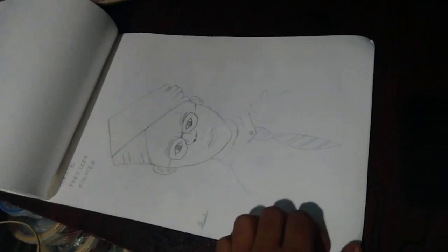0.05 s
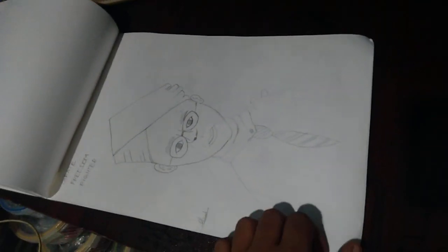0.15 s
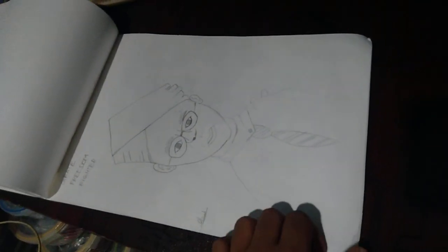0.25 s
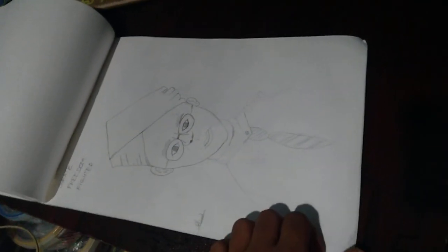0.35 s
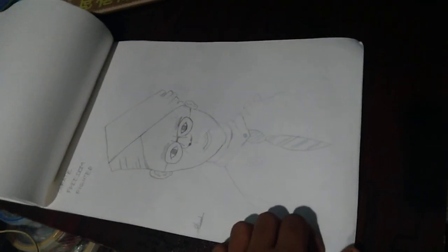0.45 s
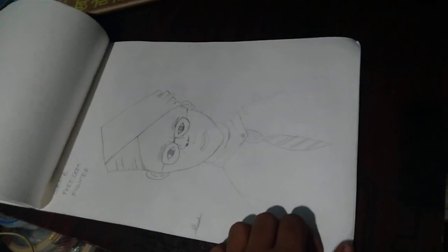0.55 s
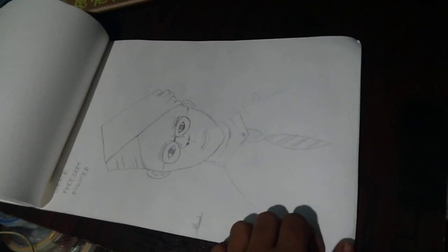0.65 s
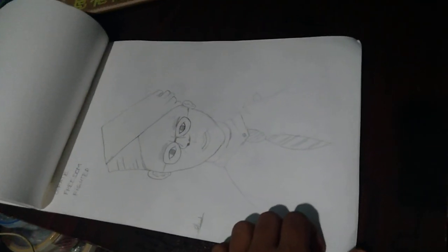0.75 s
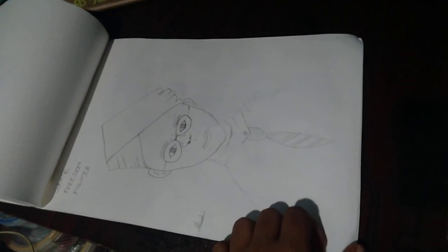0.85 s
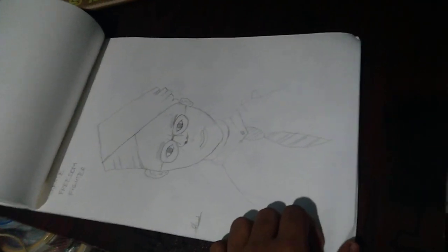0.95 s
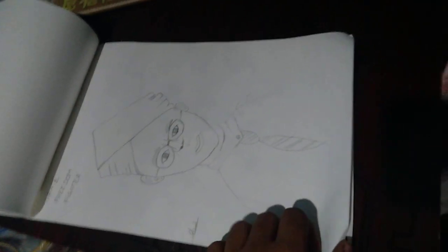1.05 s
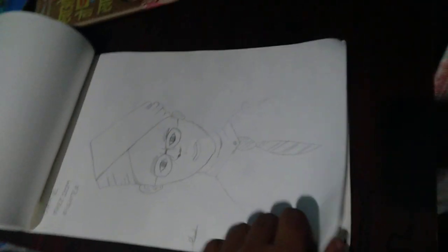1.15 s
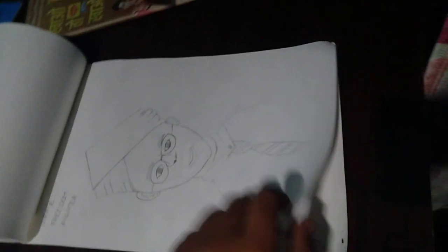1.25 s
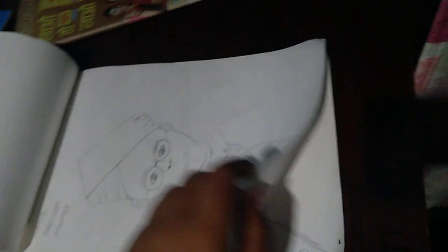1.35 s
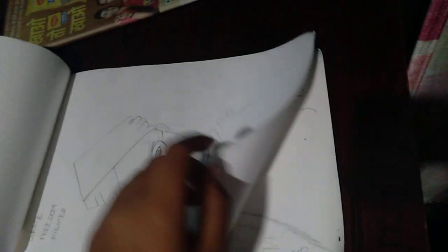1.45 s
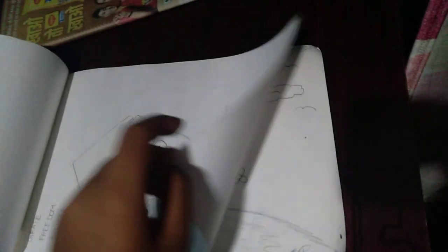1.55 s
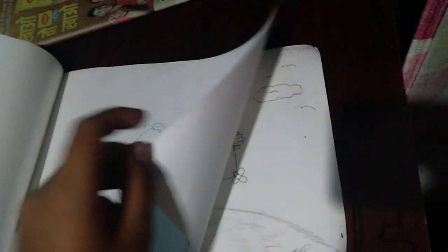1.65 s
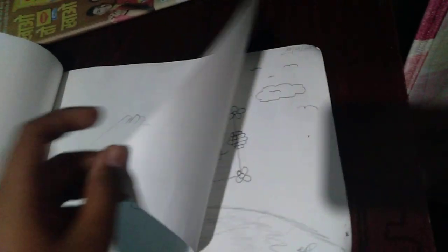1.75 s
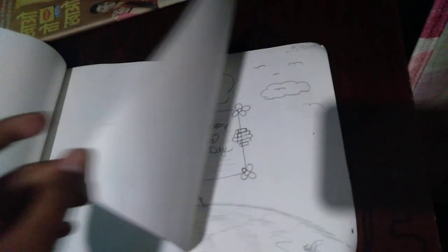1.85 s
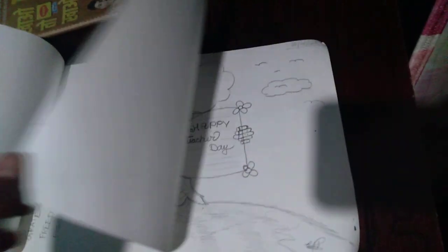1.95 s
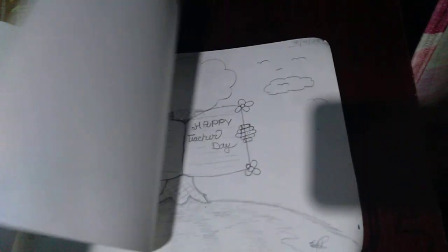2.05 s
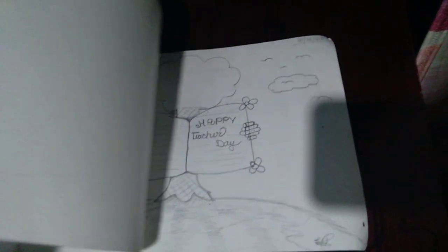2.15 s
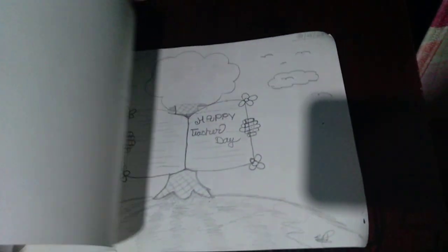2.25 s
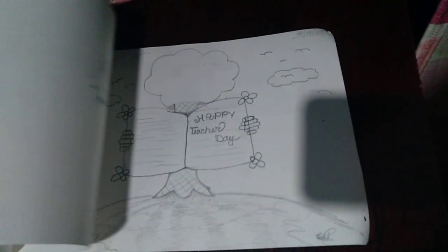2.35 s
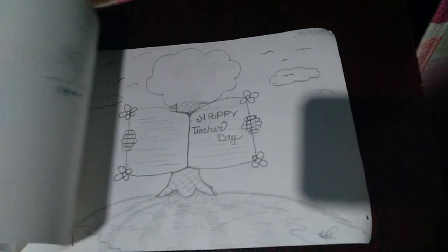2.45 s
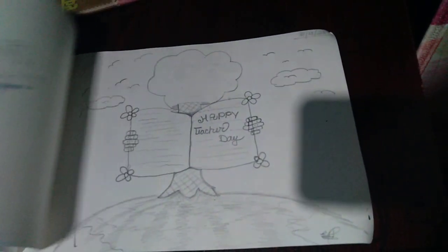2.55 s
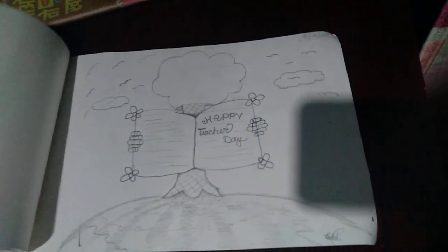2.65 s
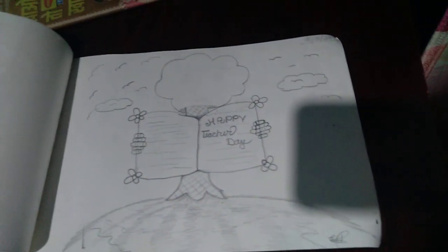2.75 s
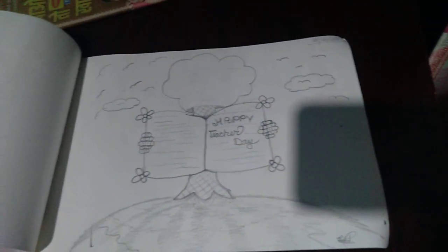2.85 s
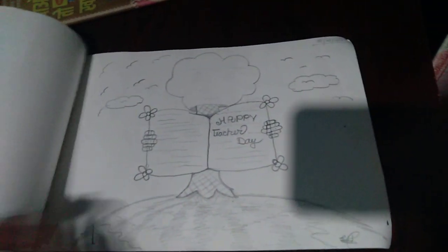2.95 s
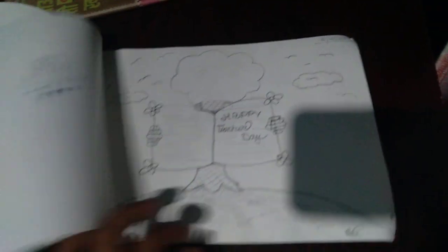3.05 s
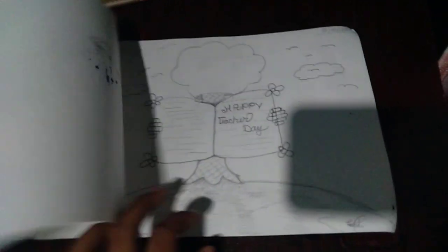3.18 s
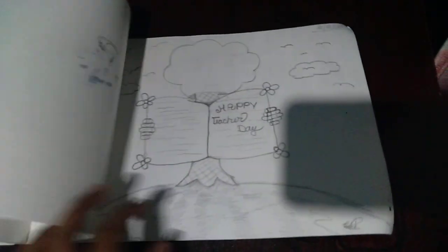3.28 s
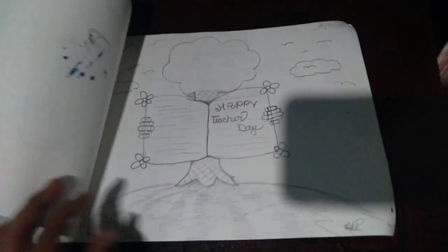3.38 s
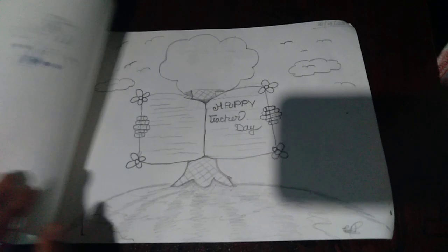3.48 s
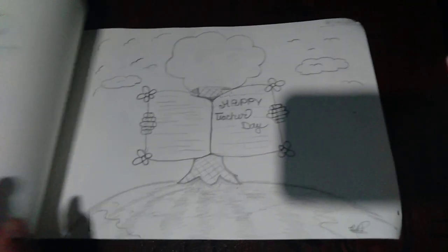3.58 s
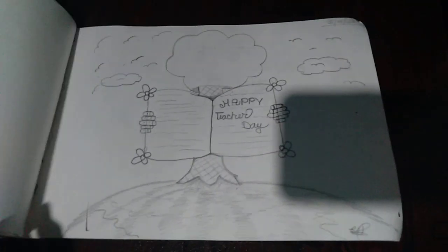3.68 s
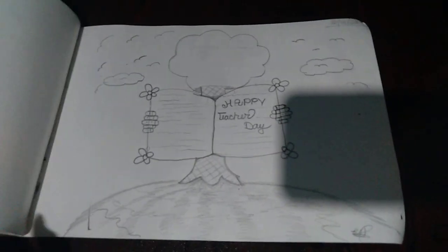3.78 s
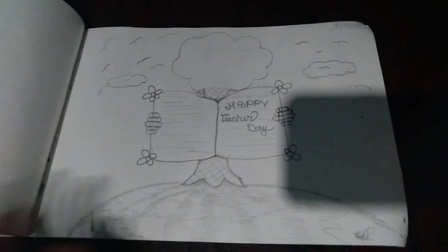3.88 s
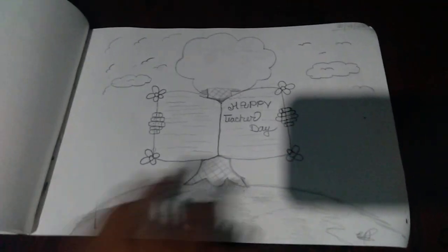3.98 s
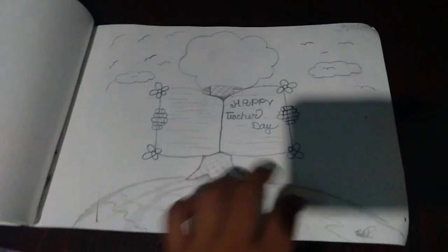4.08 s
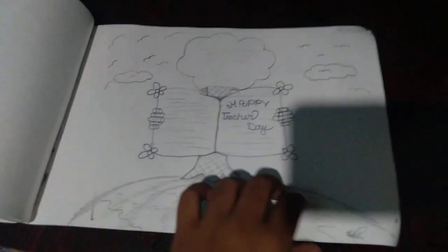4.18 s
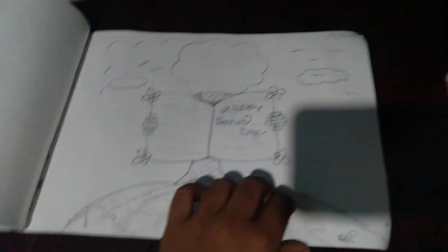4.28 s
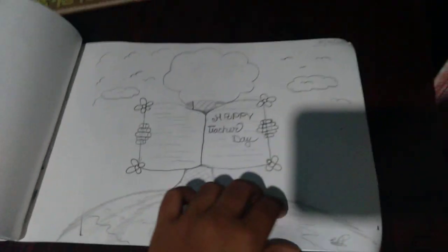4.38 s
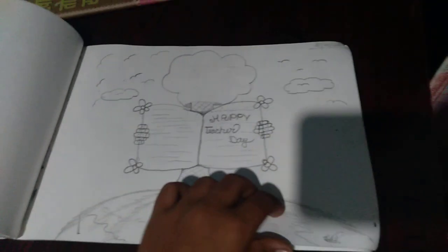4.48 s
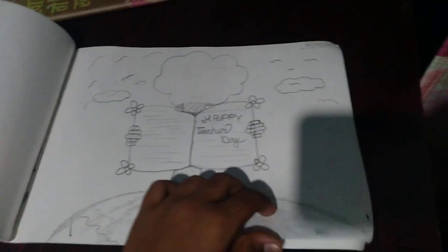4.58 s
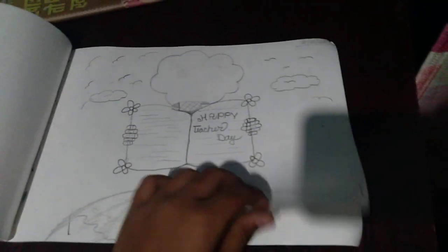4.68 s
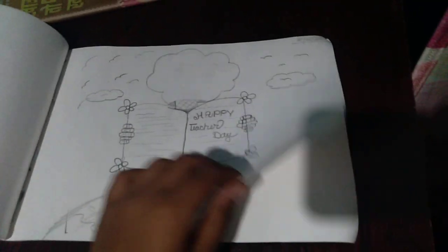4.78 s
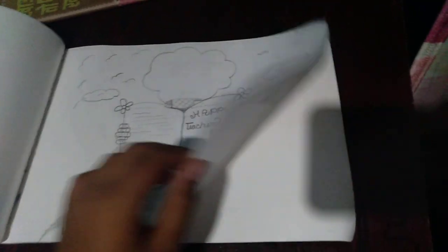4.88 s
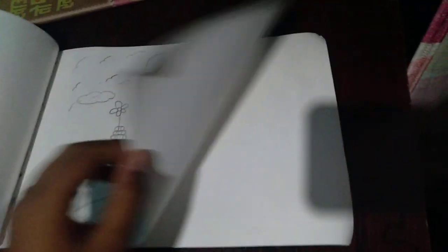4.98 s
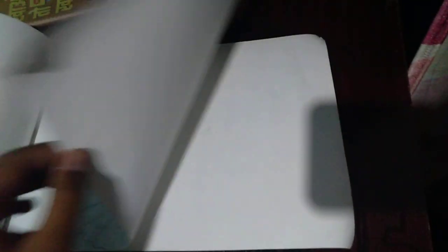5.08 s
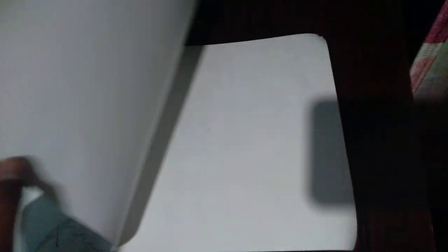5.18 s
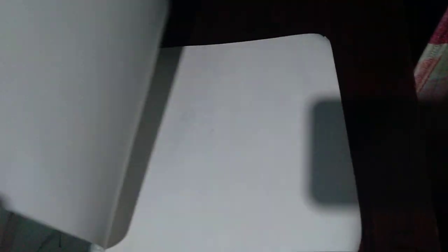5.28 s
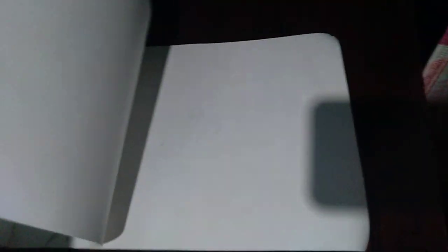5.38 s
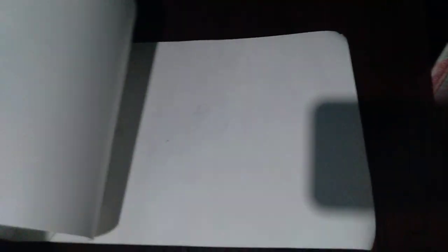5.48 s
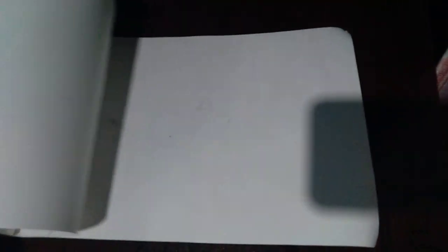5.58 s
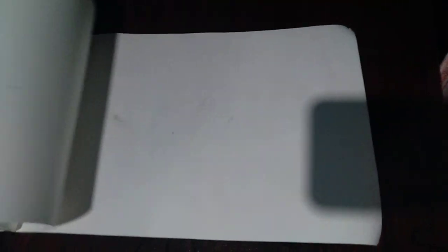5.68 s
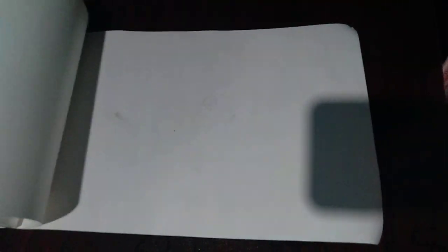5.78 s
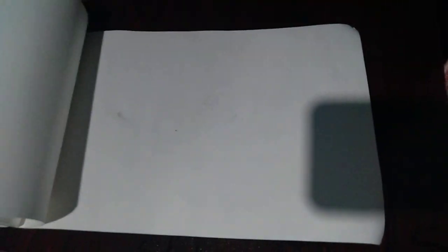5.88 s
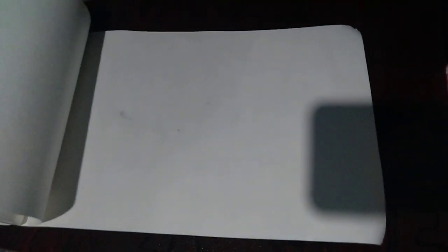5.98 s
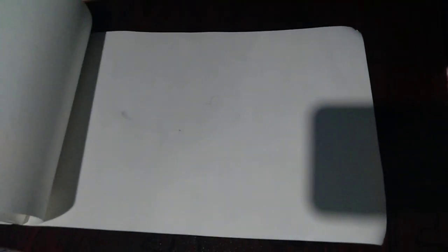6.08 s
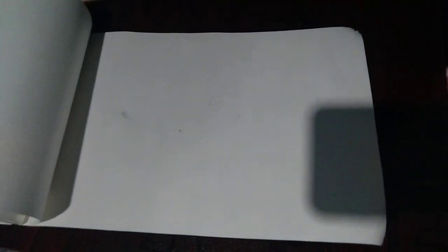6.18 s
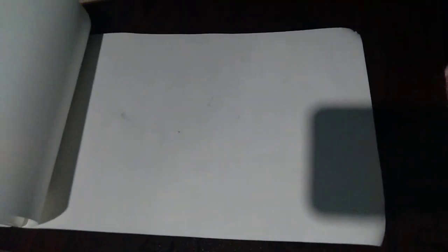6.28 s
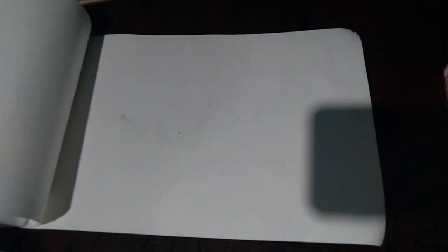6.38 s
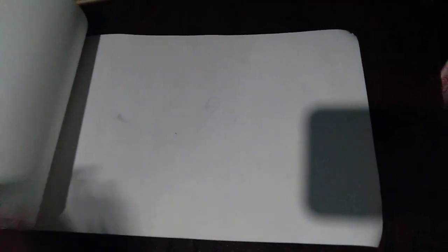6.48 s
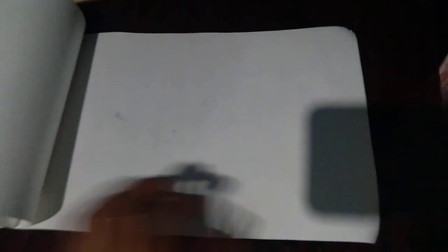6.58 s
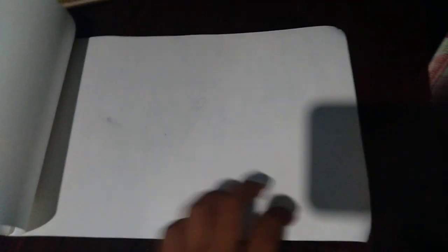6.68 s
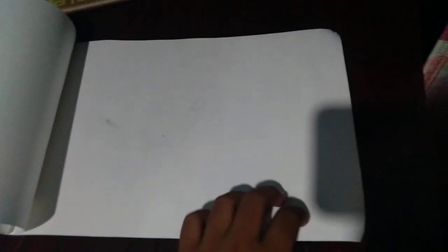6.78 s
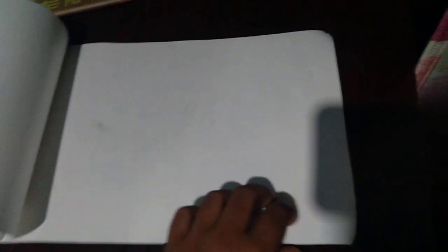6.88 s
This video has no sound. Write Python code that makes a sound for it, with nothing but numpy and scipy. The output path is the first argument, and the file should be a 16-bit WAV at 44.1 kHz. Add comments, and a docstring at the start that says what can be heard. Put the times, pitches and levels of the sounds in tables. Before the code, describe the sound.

Close up, a hand rubs softly over paper before turning two stiff pages of a sketchbook. The sheets buckle with crisp snaps and scrape over each other in brief rustles, loudest near the middle. Between and after the turns, the hand brushes the paper and nudges the book on the table with faint low thuds. The room is quiet, with only a slight hiss.

```python
"""Two stiff sketchbook pages are turned by hand on a table, close to a mono microphone in a quiet room.
First fingers brush the paper, with soft low thuds, small snaps and faint hollow swishes.
From about 2 to 5 s the pages turn: each snaps as it bends, then slides over its neighbour in short,
dense rustles that stop when the edge comes free. Between the turns and after them the hand brushes
the paper and nudges the book, and a few last snaps come after 6 s."""
import sys
import numpy as np
from scipy import signal
from scipy.fft import rfft, irfft, next_fast_len
from scipy.io import wavfile
from scipy.ndimage import uniform_filter1d, map_coordinates

SR = 44100
rng = np.random.default_rng(int(sys.argv[2]) if len(sys.argv) > 2 else 0)


def transcribe(signal):
    """Save signal, clipped to [-1, 1], as a 16-bit WAV file at the path in sys.argv[1]."""
    frames = np.atleast_2d(signal).T
    limited = np.clip(frames, -1, 1)
    pcm = np.round(limited * 32767).astype(np.int16)
    wavfile.write(sys.argv[1], SR, pcm)


N = 306054
T = np.arange(N) / SR
FREQS = np.maximum(np.fft.rfftfreq(N, 1 / SR), 1)


def undb(db):
    """Decibels to gain."""
    return 10 ** (np.asarray(db) / 20)


def unit(x):
    """Scale to rms 1."""
    return x / np.sqrt(np.mean(x ** 2))


def eq_curve(tone):
    """Gain at every frequency, drawn through (freq_hz, gain_db) points."""
    hz, db = np.transpose(tone)
    return undb(np.interp(np.log(FREQS), np.log(hz), db))


def colour(x, tone):
    """EQ a signal and scale it to rms 1."""
    return unit(irfft(rfft(x) * eq_curve(tone), N))


def resonate(x, hz, width_hz):
    """A damped resonance with steep skirts, centred in time on its push."""
    size = next_fast_len(len(x))
    freqs = np.maximum(np.fft.rfftfreq(size, 1 / SR), 1)
    detune = (freqs - hz ** 2 / freqs) / width_hz
    return irfft(rfft(x, size) / np.sqrt(1 + detune ** 4), size)[:len(x)]


def drift(rate_hz):
    """Smooth random modulation at rms 1."""
    hold = max(int(SR / rate_hz), 2)
    steps = np.repeat(rng.standard_normal(N // hold + 1), hold)[:N]
    return unit(uniform_filter1d(steps, hold))


def swell(peak_s, rise_s, fade_s):
    """Span and envelope of a soft touch: exponential attack, exponential decay."""
    span = slice(max(int((peak_s - 6 * rise_s) * SR), 0), int((peak_s + 6 * fade_s) * SR))
    return span, np.exp(np.minimum((T[span] - peak_s) / rise_s, (peak_s - T[span]) / fade_s))


def friction(slips_per_s, spread_db, smooth_db):
    """Paper fibres catch and slip: dense clicks of uneven size over a smooth hiss."""
    slips = (rng.random(N) < slips_per_s / SR) * rng.choice([-1, 1], N)
    sizes = undb(spread_db * np.minimum(rng.exponential(size=N), 4))
    return unit(unit(slips * sizes) + undb(smooth_db) * rng.standard_normal(N))


def band_flicker(x, depth_db, hold_s, band_hz):
    """A watery effect: now and then a narrow band swells out of the rest."""
    size = 1024
    hz, s, spectrum = signal.stft(x, SR, nperseg=size)
    field = rng.standard_normal((size, size))
    grid = np.meshgrid(hz / band_hz, s / hold_s, indexing="ij")
    wander = map_coordinates(field, grid, order=2, mode="wrap")
    gain = undb(depth_db * np.clip(wander, -.5, 2))
    return unit(signal.istft(spectrum * gain, SR, nperseg=size)[1][:N])


# EQ of the background hiss: freq_hz, gain_db
BACKGROUND_TONE = [(100, -2), (300, 0), (1000, -17), (2500, -15.5), (4200, -21.5), (6500, -2.5),
                   (8000, -4.5), (11000, 1), (15500, -13)]

def background_hiss(level_db=-80):
    """A faint, steady bed of noise."""
    return colour(rng.standard_normal(N), BACKGROUND_TONE) * undb(level_db)


# EQ of skin rubbing on paper: freq_hz, gain_db
SKIN_TONE = [(300, -12.5), (550, -15.5), (800, -7), (1100, -8.5), (1600, -7.5), (2500, -6.5), (3500, -7.5),
             (5000, -15.5), (7000, -28)]
# EQ of the fine hiss on top of the rub: freq_hz, gain_db
FINE_HISS_TONE = [(3500, -27), (5200, -1), (6300, 2), (7300, 7.5), (8200, 7), (9500, -8.5), (11000, 3.5),
                  (13000, -15), (15500, -11.5)]
# finger moves on the page: peak_s, rise_s, fade_s, skin_db, centre_hz, hiss_db
BRUSHES = [ (0.02, 0.091, 0.24, -62, 3060, -63), (0.124, 0.028, 0.036, -55, 3040, -50),
           (0.41, 0.0023, 0.027, -62, 3740, -61.5), (0.659, 0.024, 0.026, -72.5, 2400, -56),
           (1.02, 0.054, 0.062, -73.5, 1490, -68.5), (1.31, 0.017, 0.092, -60.5, 3240, -56.5),
           (1.605, 0.017, 0.063, -62.5, 1880, -64.5), (1.89, 0.062, 0.12, -62.5, 1920, -66),
           (2.669, 0.072, 0.036, -58, 1790, -60), (2.92, 0.07, 0.036, -69.5, 1670, -68),
           (3.45, 0.13, 0.21, -60, 2230, -60), (3.6, 0.063, 0.09, -70, 3030, -55.5),
           (4.227, 0.0022, 0.14, -61.5, 2000, -63.5), (4.407, 0.0026, 0.26, -61, 2600, -66.5),
           (4.87, 0.086, 0.047, -63.5, 2390, -59.5), (5.42, 0.012, 0.075, -68, 2960, -71),
           (5.72, 0.05, 0.057, -70.5, 1500, -75.5), (5.89, 0.024, 0.094, -65.5, 1610, -77.5),
           (6.33, 0.089, 0.082, -65, 1650, -59), (6.41, 0.002, 0.056, -61.5, 3500, -58.5),
           (6.54, 0.022, 0.065, -96, 4170, -60), (6.869, 0.058, 0.11, -72.5, 3880, -61.5)]

def fingers(rest_skin_db=-82, rest_hiss_db=-73.5, emphasis_db=1.5):
    """Skin brushes the page in short moves, and freed sheets drag on a little."""
    drags = [(release_s, 0.019, 0.14, -64.5, 1900, -67.5) for release_s in RELEASES_S]
    rub = friction(slips_per_s=900, spread_db=3, smooth_db=1)
    # a faint, watery flicker of narrow bands is laid over the rubbing noise
    rub = band_flicker(rub, depth_db=12, hold_s=.05, band_hz=110)
    skin = colour(rub, SKIN_TONE)
    out = skin * undb(rest_skin_db)  # the resting hand is never quite still
    hiss_power = np.full(N, undb(rest_hiss_db) ** 2)
    for peak_s, rise_s, fade_s, skin_db, centre_hz, hiss_db in BRUSHES + drags:
        span, speed = swell(peak_s, rise_s, fade_s)
        patch = np.roll(skin, rng.integers(N))[span]  # every move meets fresh paper
        emphasis = undb(emphasis_db) * resonate(patch, centre_hz, width_hz=0.98 * centre_hz)
        out[span] += unit(patch + emphasis) * speed * undb(skin_db)
        hiss_power[span] += (speed * undb(hiss_db)) ** 2
    return out + np.sqrt(hiss_power) * colour(rub, FINE_HISS_TONE)


# EQ of the thuds and room rumble: freq_hz, gain_db
RUMBLE_TONE = [(20, -18), (45, -19), (62, -5), (72, 1), (82, -10), (115, -8), (200, -44.5)]
# soft low thuds: peak_s, fade_s, level_db
THUDS = [(0.092, 0.048, -67), (0.435, 0.054, -68.5), (2.293, 0.13, -52), (3.184, 0.06, -58),
         (3.778, 0.055, -56.5), (4.048, 0.03, -65), (4.313, 0.11, -63), (4.97, 0.13, -58),
         (5.72, 0.074, -69.5), (6.687, 0.05, -70)]

def thuds(rumble_db=-82.5):
    """The page pushes air or the book shifts: low swells out of the room's faint rumble."""
    power = np.full(N, undb(rumble_db) ** 2)
    for peak_s, fade_s, level_db in THUDS:
        span, envelope = swell(peak_s, 0.75 * fade_s, fade_s)
        power[span] += (envelope * undb(level_db)) ** 2
    return colour(rng.standard_normal(N), RUMBLE_TONE) * np.sqrt(power)


# EQ of a snap's broadband crack: freq_hz, gain_db
CRACK_TONE = [(100, -16.5), (1000, -11.5), (3000, 9), (6000, -8), (9000, 14.5), (12500, -10.5), (15500, -1)]
# sheet snaps and finger taps: peak_s, length_ms, body_hz, width_hz, body_db, crisp_db, crack_db
SNAPS = [ (0.1286, 4.2, 3100, 1500, -43, -55, -39), (0.137, 6.1, 2820, 1800, -51, -55, -46),
         (2.197, 2.1, 403, 400, -37.5, -62, -68), (2.209, 12, 530, 219, -41.5, -42, -57),
         (2.2417, 2.4, 3430, 1500, -36.5, -39, -55), (2.342, 13, 776, 150, -48, -46, -66),
         (2.679, 2.9, 1290, 648, -43, -54.5, -72), (3.0377, 2.8, 3330, 895, -26.5, -23, -31),
         (3.047, 3.9, 2020, 2500, -32, -28, -39), (3.094, 1.7, 1190, 1200, -42, -56, -50.5),
         (3.1161, 2.1, 2370, 1960, -23, -27.5, -46), (3.115, 2.1, 773, 622, -21, -46, -46),
         (3.12, 4.7, 1445, 390, -28.5, -46, -35), (3.137, 16, 950, 893, -34.5, -49.5, -50),
         (3.3, 15, 1500, 2110, -43.5, -44, -62), (3.6147, 3.8, 4200, 2420, -47.5, -36, -49.5),
         (3.737, 4.8, 1500, 2000, -43, -53, -37), (4.0552, 3.25, 520, 279, -35, -43.5, -67),
         (4.226, 3.6, 2920, 3090, -61, -67, -53.5), (4.805, 5.4, 1640, 1580, -33.5, -65, -78),
         (4.816, 5.4, 2420, 600, -32.5, -70, -84), (4.9182, 0.69, 2620, 2000, -36.5, -23.5, -31.5),
         (5.0424, 1.35, 2010, 1854, -38.5, -37.5, -51), (6.335, 5.3, 2300, 718, -38, -38.5, -63),
         (6.34, 6.1, 1490, 600, -43, -46, -65), (6.5172, 1.7, 4130, 2480, -57, -33, -58)]

def snaps(crisp_hz=7090, crisp_width_hz=960, flick_lead_s=0.004):
    """A quick buckle cracks the sheet and rings its body and crisp edge; long strokes end in a flick."""
    out, size = np.zeros(N), 8192
    crack = colour(rng.standard_normal(N), CRACK_TONE)
    flicks = [(release_s - flick_lead_s, 3, 705, 550, -49, -52, -58) for release_s in RELEASES_S]
    for peak_s, length_ms, body_hz, width_hz, body_db, crisp_db, crack_db in SNAPS + flicks:
        first = int(peak_s * SR) - size // 2
        span = slice(first, first + size)
        push = np.exp(-2 * ((T[span] - peak_s) * 1000 / length_ms) ** 2)
        body, edge = rng.standard_normal((2, size)) * push
        layers = [(resonate(body, body_hz, width_hz), body_db),
                  (resonate(edge, crisp_hz, crisp_width_hz), crisp_db),
                  (crack[span] * push, crack_db)]
        out[span] += sum(unit(layer) * undb(db) for layer, db in layers) * np.sqrt(np.mean(push ** 2))
    return out


# faint hollow swishes: peak_s, fade_s, centre_hz, width_hz, level_db
SWISHES = [(0.195, 0.11, 1630, 446, -66), (0.719, 0.057, 550, 108, -56.5), (0.84, 0.096, 1610, 367, -63.5),
           (1.38, 0.046, 225, 74.6, -60), (1.533, 0.11, 1475, 241, -63.5), (1.685, 0.14, 1017, 47.2, -70),
           (1.77, 0.088, 450, 104, -69.5), (3.549, 0.65, 799, 110, -63), (5.035, 0.11, 490, 134, -52),
           (5.694, 0.081, 693, 263, -62.5)]

def swishes():
    """Narrow bands of noise that swell quickly and die away more slowly."""
    out, noise = np.zeros(N), rng.standard_normal(N)
    for peak_s, fade_s, centre_hz, width_hz, level_db in SWISHES:
        span, envelope = swell(peak_s, 0.37 * fade_s, fade_s)
        out[span] += unit(resonate(noise[span], centre_hz, width_hz)) * envelope * undb(level_db)
    return out


def sheet_ring(x, t60_s, ring_db):
    """The stiff sheet rings briefly with many close modes."""
    modes = rng.standard_normal(SR // 4) * undb(-60 * T[:SR // 4] / t60_s)
    ring = signal.fftconvolve(x, modes / np.linalg.norm(modes))[:N]
    return unit(x + undb(ring_db) * ring)


# envelope of each sheet-on-sheet stroke, from contact to release: time_s, level_db
SWING = [(2.192, -37.5), (2.208, -34), (2.26, -34), (2.29, -41), (2.325, -45.5), (2.352, -47)]
FOLD = [(3.034, -31.5), (3.053, -29), (3.101, -37.5), (3.122, -29.5), (3.175, -29), (3.23, -39.5),
        (3.28, -42.5), (3.302, -41.5), (3.35, -43.5)]
SMOOTH = [(3.643, -37), (3.69, -39), (3.735, -34.5), (3.77, -33.5), (3.795, -38), (3.877, -43)]
LIFT = [(4.80, -27.5), (4.816, -45.5), (4.83, -44), (4.855, -47.5), (4.874, -48.5)]
SWEEP = [(4.914, -39), (4.94, -41.5), (5.0, -41.5), (5.05, -39.5), (5.09, -42.5), (5.116, -42.5)]
RELEASES_S = [stroke[-1][0] for stroke in (SWING, FOLD, SMOOTH, SWEEP)]  # ends of the long strokes
# EQ of each stroke: freq_hz, gain_db
SWING_TONE = [(29, -38), (50, -22), (77, -12), (192, -13.5), (227, -11), (771, -6.5), (1050, -14),
              (1970, -13), (3340, -5), (4450, -18.5), (6080, -5), (7370, 0), (9820, -23), (11300, -22.5),
              (15500, -36)]
FOLD_TONE = [(47, -40), (80, -21.5), (114, -4.5), (149, -13.5), (236, -10), (368, -22), (480, -17),
             (932, -7), (1060, -17), (3080, -12.5), (3290, -6.5), (3590, -14.5), (5710, -8), (7100, -2),
             (9600, -11), (15800, -13)]
SMOOTH_TONE = [(59, -36), (100, -12.5), (170, -8), (249, -3), (460, -19.5), (544, -11.5), (687, -12.5),
               (985, -9), (1120, -15.5), (1670, -17), (3440, -9.5), (5840, -13.5), (7370, 2), (9500, -7.5),
               (15800, -11)]
LIFT_TONE = [(59, -55.5), (100, -9), (403, -1), (487, 7), (601, 9), (1460, 3), (2320, 7.5), (3540, 5.5),
             (4750, -21.5), (7250, -23), (10600, -58), (11500, -20), (15500, -36)]
SWEEP_TONE = [(59, -47), (100, -10.5), (209, -9.5), (293, -8), (589, 1.5), (956, -13), (1800, -5),
              (2130, -13), (3690, -11.5), (5400, -29.5), (7250, -3), (8410, -6.5), (9740, -25),
              (14200, -11.5), (15500, -20)]

def slides():
    """Sheet slides on sheet: it grips at once, eases as it relaxes and stops when the edge lets go."""
    rub = friction(slips_per_s=2500, spread_db=2, smooth_db=-1.5)
    rub = sheet_ring(rub, t60_s=0.23, ring_db=-8)
    rub *= undb(1.13 * drift(rate_hz=130))  # the grip comes and goes
    out = np.zeros(N)
    for stroke, tone in [(SWING, SWING_TONE), (FOLD, FOLD_TONE), (SMOOTH, SMOOTH_TONE),
                         (LIFT, LIFT_TONE), (SWEEP, SWEEP_TONE)]:
        time_s, level_db = np.transpose(stroke)
        gate = 1. * ((T > time_s[0]) & (T < time_s[-1]))
        contact = uniform_filter1d(gate, size=170)  # 4 ms fades
        out += colour(rub, tone) * contact * undb(np.interp(T, time_s, level_db))
    return out


# EQ of the book shifting on the table: freq_hz, gain_db
NUDGE_TONE = [(60, -28), (120, -15.5), (180, 3), (235, 7.5), (320, -4), (450, -15), (620, -27), (790, -9.5),
              (950, -26), (1300, -32)]
# spells of the hand nudging the book: start_s, end_s, level_db
NUDGES = [(2.666, 2.84, -68.5), (2.93, 3.04, -72), (3.595, 3.972, -66), (4.07, 4.496, -65.5),
          (4.71, 4.827, -63), (4.83, 4.943, -55.5), (5.126, 5.601, -73), (5.63, 6.39, -69),
          (6.482, 6.78, -78.5)]

def nudges(bumps_per_s=12, bump_depth_db=4.5, edge_s=0.018, rest_db=-92):
    """While the hand works at the book, it shifts on the table in dull, uneven bumps."""
    push = undb(rest_db)
    for start_s, end_s, level_db in NUDGES:
        outside_s = np.maximum(np.maximum(start_s - T, T - end_s), 0)
        push = np.maximum(push, undb(level_db) / (1 + (outside_s / edge_s) ** 2))
    pace_hz = bumps_per_s * (1 + 0.3494 * drift(rate_hz=8))
    jerks = np.sin(2 * np.pi * np.cumsum(pace_hz) / SR)
    scuff = colour(rng.standard_normal(N), NUDGE_TONE)
    return push * unit(scuff * undb(bump_depth_db * jerks))


# EQ of the wall reflections: freq_hz, gain_db
WALL_TONE = [(100, -8.5), (500, 3.5), (2000, -0.5), (5000, -1), (15000, 0)]

def room(x, t60_s, wet_db):
    """The walls add a weak reverb tail to the direct sound."""
    tail = rng.standard_normal(SR) * undb(-60 * T[:SR] / t60_s)
    walls = rfft(tail / np.linalg.norm(tail), N) * eq_curve(WALL_TONE)
    return x + undb(wet_db) * irfft(rfft(x) * walls, N)


def scene():
    """All sources at one microphone, the same in both channels; reverb on slides and snaps only."""
    hiss = background_hiss()
    pages = room(slides() + snaps(), t60_s=0.25, wet_db=-14.5)
    mono = pages + fingers() + nudges() + swishes() + thuds() + hiss
    return np.array([mono, mono])


def record(dry):
    """A steep low-pass cuts the very top."""
    cutoff_hz = 15900
    return signal.sosfilt(signal.ellip(10, .2, 70, cutoff_hz, fs=SR, output="sos"), dry)


dry = scene()
out = record(dry)
transcribe(out)
```